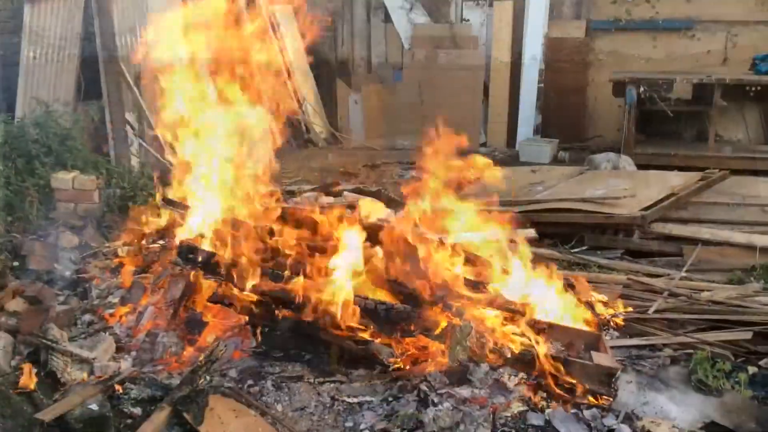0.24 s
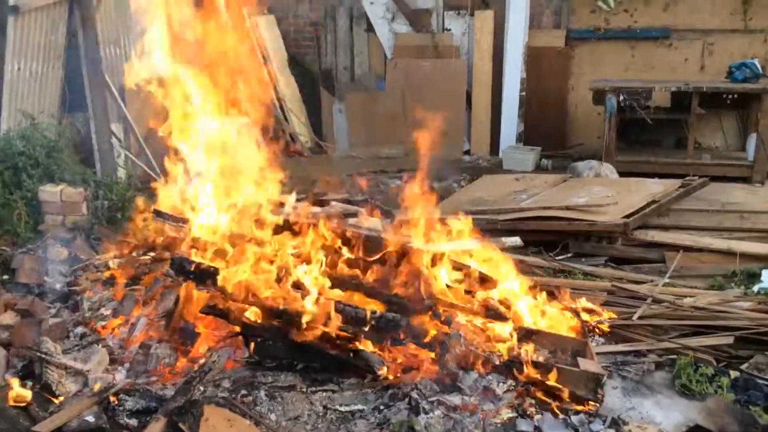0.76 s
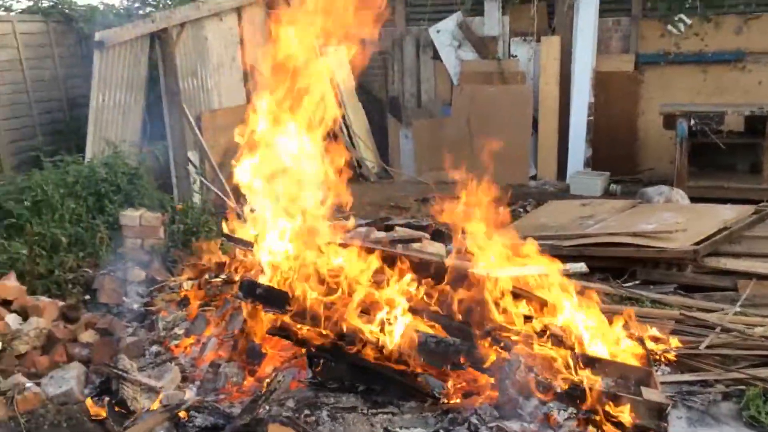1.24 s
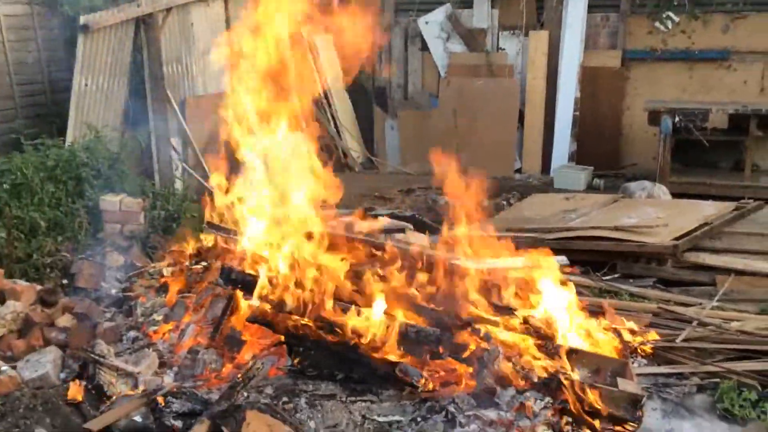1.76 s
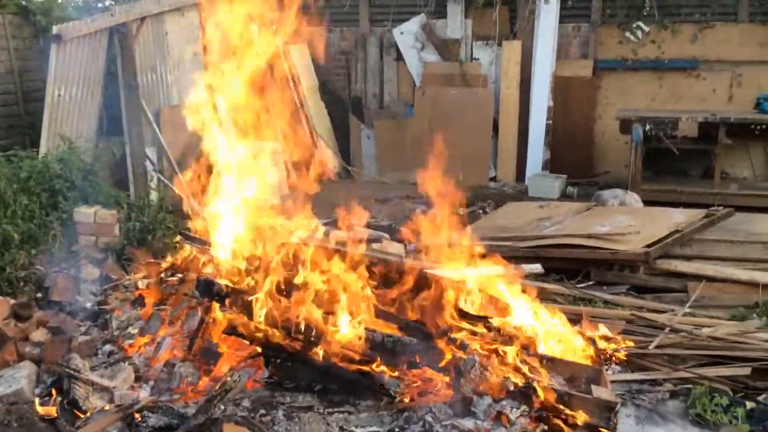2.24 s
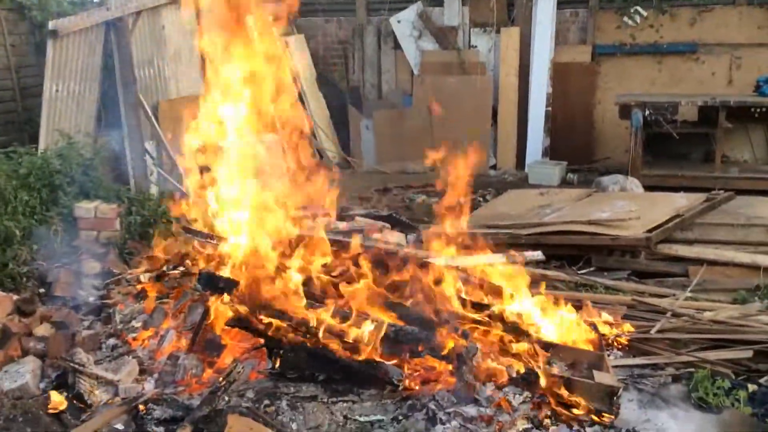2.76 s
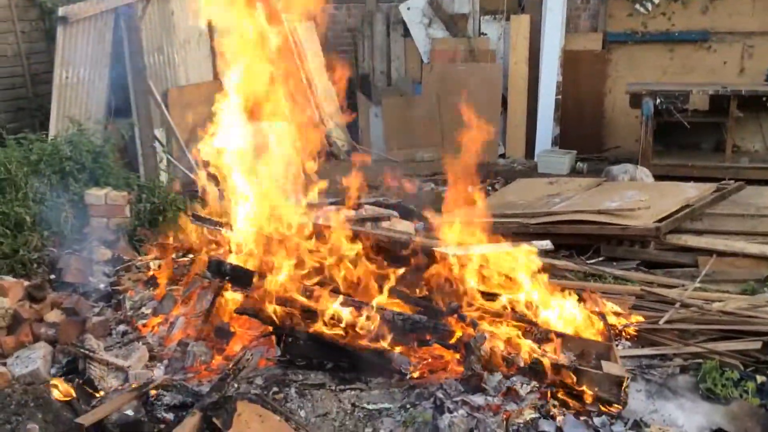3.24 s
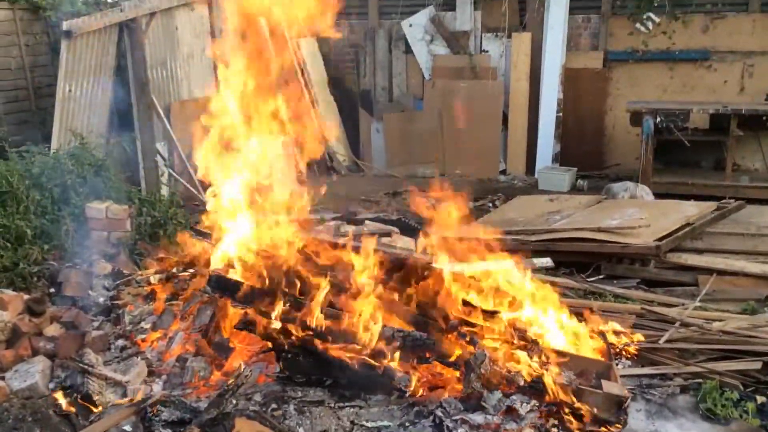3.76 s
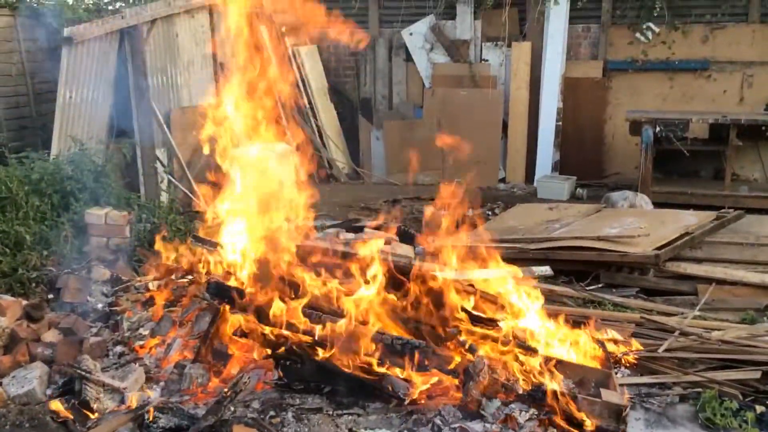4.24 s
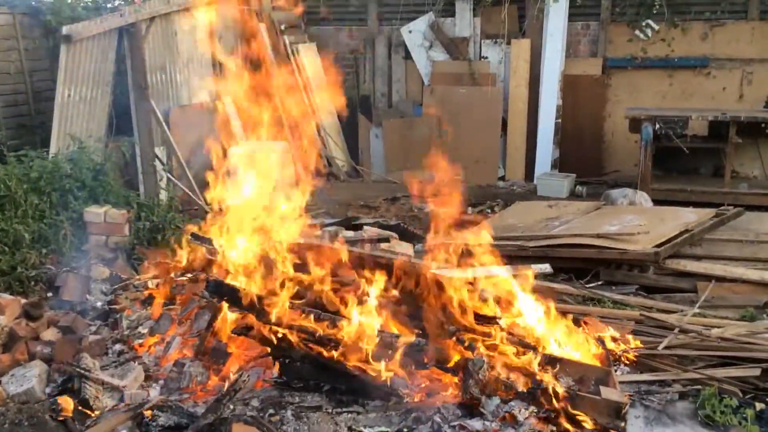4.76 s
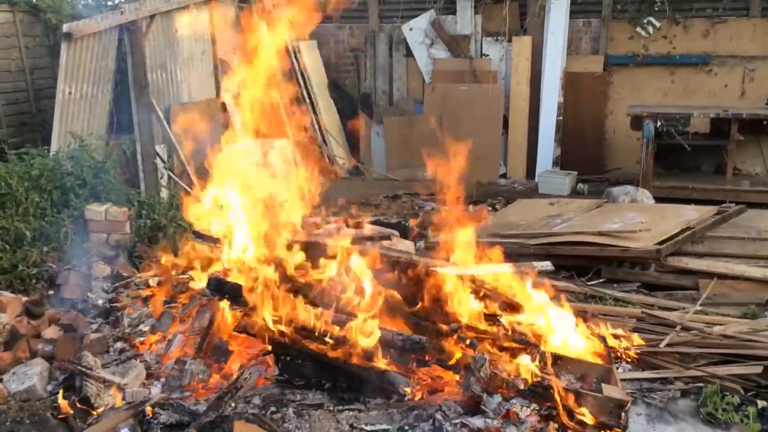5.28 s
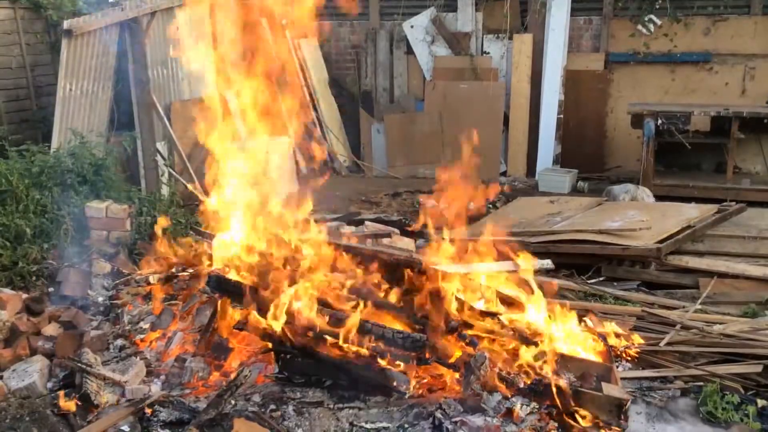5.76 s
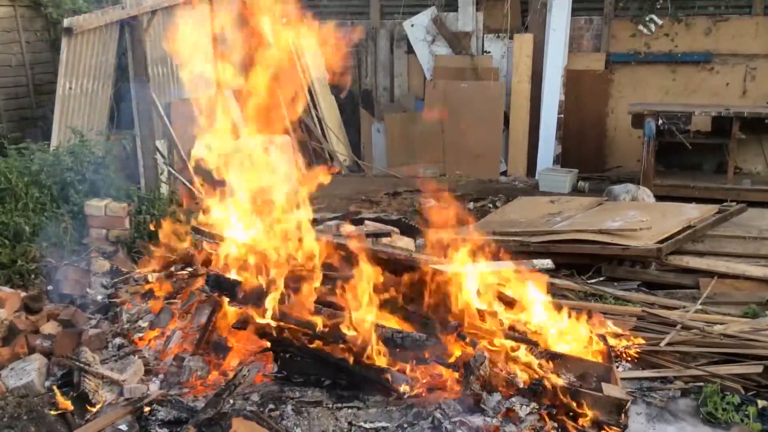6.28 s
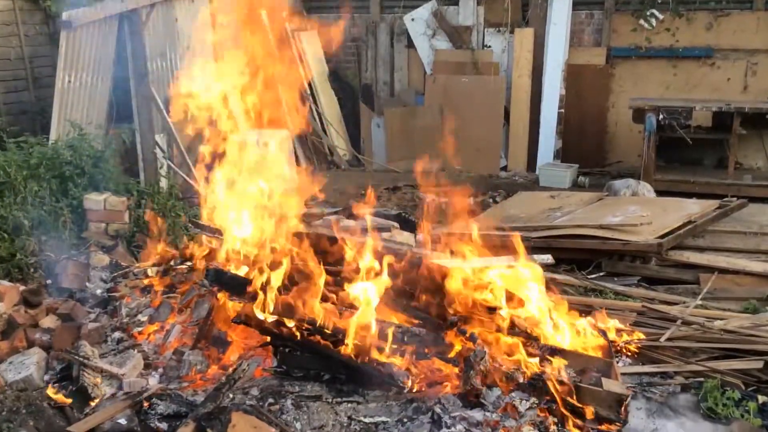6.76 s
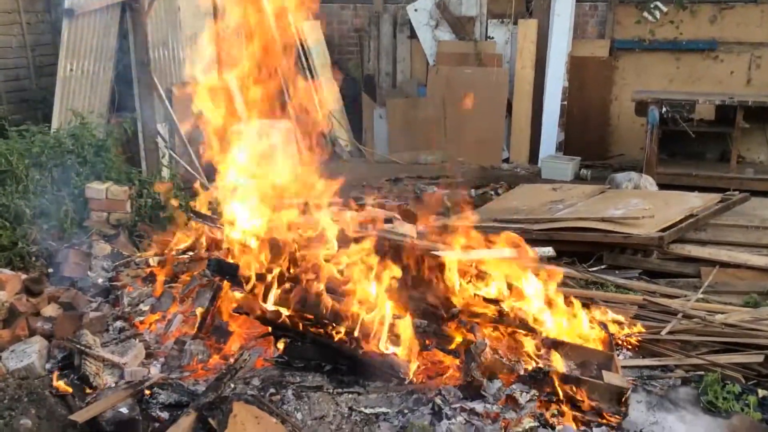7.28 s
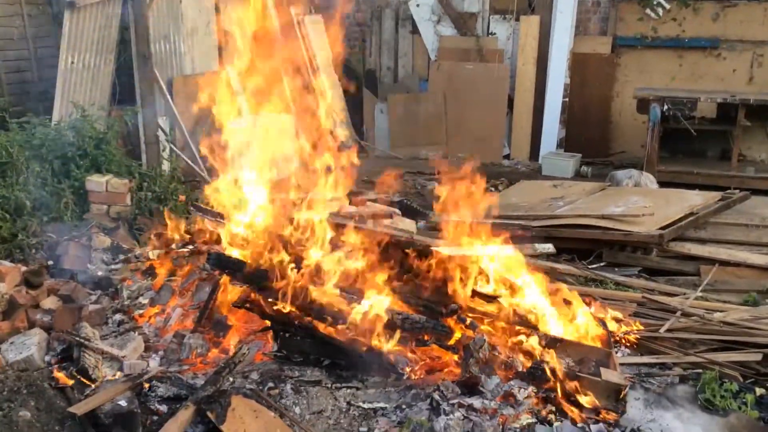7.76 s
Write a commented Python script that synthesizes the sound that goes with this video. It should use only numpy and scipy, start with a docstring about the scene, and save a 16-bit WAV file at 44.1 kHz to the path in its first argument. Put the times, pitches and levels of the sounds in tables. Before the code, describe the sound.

A bonfire of scrap wood burns a few metres away in a small yard. Sharp irregular snaps, some very loud, stand out over dense fine crackling and bright twig ticks. Bigger pieces crack with a dull thump and a brief woody knock. Brief sizzles of sap, soft hiss and a quiet low roar lie beneath. Nearby walls and clutter add quick, scattered echoes. The mono pickup is close and clear.

```python
"""Bonfire in a small yard

Scrap wood snaps and pops a few metres away; each snap is a sharp pulse with splintering over a dull thump.
Thick pieces knock as dying sines, thin twigs tick; near walls and clutter throw delayed, scattered copies back.
Crackle and sizzling sap are crowds of tiny bursts; hiss, the low roar of flames and far traffic are
shaped noise; a faint hum is a sine wavering in pitch and level."""
import sys
import numpy as np
from scipy import signal
from scipy.fft import rfft, irfft
from scipy.io import wavfile
from scipy.ndimage import uniform_filter1d

SR = 44100
rng = np.random.default_rng(int(sys.argv[2]) if len(sys.argv) > 2 else 0)


def transcribe(u):
    """Save the signal u as a 16-bit wav file named by the first command-line argument.

    u: samples, shape (n,) or (channels, n), limited to [-1, 1]; the rate is SR.
    q: integer samples, one column per channel.
    """
    v = np.clip(np.atleast_2d(u).T, -1, 1)
    q = np.round(v * 32767).astype(np.int16)
    wavfile.write(sys.argv[1], SR, q)


N = 353682

# clear snaps; thin twigs are narrow, thick wood wide, snaps hidden behind the pile have a high return:
# (time [s], direct level [dB], centre [Hz], spread [octaves], yard return re direct [dB])
SNAPS = [(0.0005, -9, 11200, 0.69, -1), (0.0358, -20.5, 9000, 0.93, -15), (0.0821, -27, 3530, 0.42, 10),
         (0.093, -30.5, 10910, 1.1, 14), (0.1858, -14, 12700, 0.16, -5), (0.217, -13.5, 9350, 0.5, -1.5),
         (0.236, -19, 6760, 1.4, -1), (0.307, -14, 10200, 0.32, -7), (0.3125, -13.5, 11300, 0.19, -12),
         (0.867, -16.5, 6070, 0.16, 2.5), (1.073, -14.5, 7260, 1.1, -1.5), (1.0942, -13.5, 4230, 1.4, -3.5),
         (1.2397, -12.5, 5330, 0.79, -5), (1.351, -16.5, 7200, 0.7, -1.5), (1.437, 0, 10800, 0.48, 0.5),
         (1.4602, -5.5, 8900, 0.48, -7), (1.524, -6, 5700, 0.58, -6.5), (1.6093, -11, 9500, 0.38, -8),
         (1.6183, 0, 10300, 0.65, -2), (1.6758, -16.5, 8260, 1.4, 2), (1.7418, -16.5, 910, 0.32, -7),
         (1.9323, 0, 8160, 0.39, -8), (2.1977, -10, 11200, 0.18, -5), (2.211, -13, 5270, 1.03, -1.5),
         (2.2484, -10.5, 10600, 0.37, -3.5), (2.2894, 0, 9300, 0.63, 1), (2.5895, -10, 8600, 0.86, -6),
         (2.703, -14, 6800, 0.9, -5), (2.899, -15, 10300, 0.34, -6), (3.1345, -14.5, 6650, 0.52, -0.5),
         (3.1505, -9, 2530, 0.39, -7.5), (3.487, -19.5, 3980, 1.2, -7), (3.5581, -6, 9700, 0.54, -3.5),
         (3.8756, 1, 4200, 0.78, -6.5), (3.9978, -9, 9250, 0.37, -7), (4.0897, -7.5, 10500, 0.69, -8.5),
         (4.309, -20.5, 300, 1.33, -15), (4.335, -26, 3250, 1.2, 10), (4.3793, -7, 9500, 0.59, -9.5),
         (4.4406, 1, 9400, 0.45, -6.5), (4.4675, -14.5, 9300, 0.93, 4), (4.568, -13.5, 850, 0.54, -11),
         (4.6526, -12.5, 7080, 0.66, -5), (4.7014, -9.5, 4640, 1.2, -2), (4.917, -7.5, 7800, 0.52, -4.5),
         (4.9636, -18, 5830, 0.8, -10), (4.9814, -6.5, 8500, 0.54, -7.5), (5.2938, -9.5, 2900, 1.24, 0.5),
         (5.3353, -15, 3480, 0.99, -10.5), (5.4493, -9.5, 3050, 0.87, 0), (5.474, -16, 3300, 0.28, 3),
         (5.569, -12.5, 9860, 0.28, -14), (5.6139, -2.5, 11600, 0.57, -8.5),
         (5.7733, -23.5, 8100, 1.2, 8.5), (5.814, -7, 10900, 0.71, -1), (5.9485, 0, 6800, 1.25, -5.5),
         (6.1166, 2.5, 3270, 0.53, -3.5), (6.6218, -13, 4230, 0.54, -10), (6.7345, -12, 4600, 1.5, 0),
         (6.7491, 0.5, 2920, 0.51, -3), (6.881, -13, 7600, 0.6, -5.5), (7.1134, -15.5, 7250, 0.77, -2.5),
         (7.242, -1.3, 8900, 0.61, -8.5), (7.7374, 0.9, 4450, 0.54, -4.5), (7.771, -11, 3000, 0.46, -1),
         (7.871, -15, 5400, 0.57, -8), (7.988, -14, 7010, 0.49, -7)]
# flat walls and boards around the fire: (delay [ms], level [dB], smear [ms])
WALLS = [(5.83, -4.5, 1), (14., -15.5, 0.84), (17.5, -24, 0.92)]
# liveliness of fine crackle and hiss: (time [s], level [dB])
LIVELY = [(0, 5), (.7, 6), (1, -1), (1.3, 3), (2.1, 5), (2.45, -3), (3.3, 1.5), (3.7, 9), (4.1, -10),
          (4.5, 3), (5.4, 4), (5.7, 4.5), (6.5, -2), (6.9, 5), (7.35, -2.5), (7.65, -2.5), (8.02, 8.5)]
LEAD = 128  # samples ahead of each pulse
# pulse phase [rad]: snaps rise to a crest and fall into a deeper dip, thumps push outward first
SNAP_PHASE, THUMP_PHASE = 2.6, -0.9


def gain_of(db):
    """Amplitude factor of a level in dB."""
    return 10 ** (np.asarray(db) / 20)


def unit(x):
    """Energy 1 along the last axis."""
    return x / np.sqrt((x ** 2).sum(-1, keepdims=True) + 1e-30)


def burst_colour(f, hz, octaves, skirt_db):
    """Unit-rms spectrum: a bell on the pitch scale over a wide skirt that fades far above the centre."""
    away = np.log2(f / hz) / np.clip(octaves, 0.2, 2)
    bell = np.exp(-away ** 2 / 4) * np.sqrt(hz / f)
    skirt = gain_of(skirt_db) * f / (f + 47.0) / (1 + (f / (3.8 * hz)) ** 2)
    colour = bell + skirt
    return colour / np.sqrt((colour ** 2).mean(-1, keepdims=True))


def yard_tail(noise, lumps, ms, f):
    """Scatter off clutter: lumpy noise, a shorter decay ruling the bass and a longer one the treble."""
    # bass first, then treble: (t60 before tapering [s], level [dB])
    decays = [(0.14, -4.5), (0.21, 0)]
    cross_hz, lump_db = 6330, 4.5
    debris = noise * gain_of(lump_db * lumps)
    debris = debris * np.clip(ms / 9.1, 0, 1) * np.sqrt(1 - ms / ms[-1])
    bass = 1 / (1 + (f / cross_hz) ** 2)
    tail = 0
    for share, (t60_s, db) in zip((bass, 1 - bass), decays):
        decay = gain_of(-60 * abs(ms) / 1000 / t60_s)
        tail = tail + gain_of(db) * share * rfft(unit(debris * decay))
    return tail


def bursts(rows, phase, size, skirt_db, splinter_ms=5.0, place_ms=0.111, place_db=0.0, smear_db=-1.5):
    """Each row (s, direct dB, Hz, octaves, return dB) gives pulse, splintering, echoes and tail in one colour."""
    rip_cycles, rip_longest_ms, jerks_db, splinter_db = 3, 0.5, -5.5, -5.5
    s, direct_db, hz, octaves, back_db = np.transpose(rows)[:, :, None]
    ms = (np.arange(size) - LEAD) * 1000 / SR
    f = np.fft.rfftfreq(size, 1 / SR) + 1
    noise = rng.standard_normal((len(rows), 2, size))
    place = rng.standard_normal((len(rows), len(WALLS), 2, 1))
    lumps = rng.standard_normal((len(rows), size // 64)).repeat(64, axis=1)

    # lopsided pressure pulse plus jerks, then fibres keep tearing
    pulse = np.exp(1j * phase - 2j * np.pi * f * LEAD / SR)
    rip_ms = np.minimum(1000 * rip_cycles / hz, rip_longest_ms)
    jerks = unit(noise[:, 1] ** 3 * (ms > 0) * np.exp(-abs(ms) / rip_ms))
    pulse = (pulse + gain_of(jerks_db) * rfft(jerks)) / np.hypot(1, gain_of(jerks_db))
    splinter = unit(noise[:, 0] * (ms > 0) * np.exp(-abs(ms) / splinter_ms))
    direct = pulse + gain_of(splinter_db) * rfft(splinter)

    sharp = smeared = 0
    for k, (delay_ms, db, smear_ms) in enumerate(WALLS):
        # each burst has its own place in the pile
        delay_ms = delay_ms + place_ms * place[:, k, 0]
        gain = gain_of(db + place_db * place[:, k, 1])
        sharp = sharp + gain * np.exp(-2j * np.pi * f * delay_ms / 1000)
        smear = (ms > delay_ms) * np.exp(-abs(ms - delay_ms) / smear_ms)
        smeared = smeared + gain * unit(noise[:, 0] * smear)
    back = sharp * direct + gain_of(smear_db) * rfft(smeared)
    back = back + yard_tail(noise[:, 1], lumps, ms, f)

    spectrum = gain_of(direct_db) * direct + gain_of(back_db) * back
    sounds = irfft(spectrum * burst_colour(f, hz, octaves, skirt_db))
    out = np.zeros(N + size + LEAD)
    for at, sound in zip(np.round(s[:, 0] * SR).astype(int), sounds):
        out[at:at + size] += sound
    return out[LEAD:LEAD + N]


def roar(level_db=-53.5, patchy_db=1.6, follow=0.26):
    """Flames, far traffic and hiss: noise shaped in time-frequency, with drifting patches."""
    # mean spectrum: (frequency [Hz], relative density [dB per Hz])
    spectrum = [(22, -47), (36, -13), (52, 6.5), (115, -0.5), (185, 1.5), (413, -6), (1050, -4.5),
                (1450, -11), (2000, -17), (3400, -22.5), (7600, -25.5), (13600, -25), (15400, -19.5)]
    # middle of the roar, thinning for a moment: (time [s], level [dB])
    swell = [(1.9, -1.84), (2.5, -6), (3.3, -2)]
    hop, frames = 512, N // 512 + 5
    hz = np.fft.rfftfreq(2048, 1 / SR)
    frame_s = np.arange(frames) * hop / SR
    real, imag, patches = rng.standard_normal((frames, 1025, 3)).T
    patches = uniform_filter1d(uniform_filter1d(patches, size=7, axis=0), size=8, axis=1)
    f, db = np.transpose(spectrum)
    field_db = np.interp(np.log(hz + 1), np.log(f + 1), db)[:, None]
    field_db = field_db + patchy_db * patches / patches.std()
    # hiss, not rumble, follows the crackle
    hiss_share = 1 / (1 + (1800.0 / (hz[:, None] + 1)) ** 4)
    field_db = field_db + follow * hiss_share * np.interp(frame_s, *np.transpose(LIVELY))
    middle = np.exp(-np.log2((hz[:, None] + 1) / 1070.0) ** 2 / 6.3)
    field_db = field_db + middle * np.interp(frame_s, *np.transpose(swell))
    x = signal.istft((real + 1j * imag) * gain_of(field_db), nperseg=2048, noverlap=1536)[1][:N]
    return gain_of(level_db) * x / x.std()


def hum(flutter_db=2.2, wander_hz=2.07):
    """Faint low sine, probably a distant engine: wavering, swelling to its strongest near 7.3 s, then easing."""
    # (time [s], mean frequency [Hz], mean level [dB rms])
    course = [(0, 63, -65.5), (3.1, 66, -62), (3.9, 58.4, -70), (5.3, 65, -61), (6., 77, -64.5),
              (7.3, 79.5, -56.5), (8.02, 78.6, -60)]
    s, hz, db = np.transpose(course)
    t = np.arange(N) / SR
    knots_s = np.arange(100) * 0.074
    flutter, wander = (np.interp(t, knots_s, v) for v in rng.standard_normal((100, 2)).T)
    turns = np.cumsum(np.interp(t, s, hz) + wander_hz * wander) / SR
    level = gain_of(np.interp(t, s, db) + flutter_db * flutter)
    return np.sqrt(2) * level * np.sin(2 * np.pi * turns)


def crackle(count=800, level_db=-46.5, spread_db=7.5, low_hz=3130.0, high_hz=17300.0):
    """Small pockets burst at random; most are faint, a few stand out."""
    when, size, pitch, shade, width = rng.random((count, 5)).T
    s = when * N / SR
    db = np.interp(s, *np.transpose(LIVELY)) + level_db
    db = db - spread_db * np.log(np.maximum(size, 0.16))
    hz = low_hz * (high_hz / low_hz) ** np.sqrt(pitch)
    rows = np.c_[s, db, hz, 0.2 + 0.6 * width, db + 1 - 8 * shade]
    return bursts(rows, SNAP_PHASE, size=2048, skirt_db=-9.0)


def snaps():
    """Pockets of steam burst: sharp pulses with short splintering."""
    s, db, hz, spread, back_db = np.transpose(SNAPS)
    return bursts(np.c_[s, db, hz, spread, db + back_db], SNAP_PHASE, size=7168, skirt_db=-11.0)


def thumps(octaves=0.52, back_db=-6.0):
    """Each snap pushes dully through the wood: weak for thin bright twigs, stronger for wide or low snaps."""
    level_db, db_per_spread, db_per_pitch = -34.5, 16, -9  # slopes per octave
    centre_hz, scatter_octaves = 362, 0.15
    s, db, hz, spread, _ = np.transpose(SNAPS)
    db = db + level_db + db_per_spread * spread + db_per_pitch * np.log2(np.maximum(hz, 2000.0) / 5000)
    hz = centre_hz * 2 ** (scatter_octaves * rng.standard_normal(len(s)))
    rows = np.c_[s, db, hz, octaves + 0 * s, db + back_db]
    return bursts(rows, THUMP_PHASE, size=4096, skirt_db=-58)


def knocks(ring_cycles=21):
    """Thick pieces ring briefly as they split: sines dying 60 dB in ring_cycles, repeated by the walls."""
    # (time [s], pitch [Hz], peak level [dB])
    splits = [(0.0824, 1160, -39), (.0817, 2160, -31), (1.5234, 3640, -18), (1.7413, 2380, -38),
              (3.15, 1260, -31), (3.15, 2000, -45), (3.8761, 2180, -41), (3.8756, 3040, -13),
              (4.7017, 905, -37.5), (5.2937, 1350, -25), (5.4495, 3420, -14), (6.116, 1040, -28),
              (6.1166, 2650, -16), (6.7495, 4100, -15), (7.737, 1400, -23.5), (7.7378, 3270, -20)]
    t, out = np.arange(1024) / SR, np.zeros(N + SR)
    for s, hz, db in splits:
        for delay_ms, path_db, _ in [(0.0042, 0, 0)] + WALLS:  # direct path first
            at = round((s + delay_ms / 1000) * SR)
            envelope = gain_of(db + path_db - 60 * hz * t / ring_cycles)
            out[at:at + len(t)] += envelope * np.sin(2 * np.pi * hz * t)
    return out[:N]


def sizzle(count=16, spread_db=3.5, scatter_octaves=0.96):
    """Sap boils out of a log: each run is a crowd of tiny bursts, denser at its start."""
    # (start [s], length [s], base level [dB], centre [Hz])
    runs = [(0.232, 0.08, -31, 9050), (3.636, 0.11, -28.5, 8300), (4.297, 0.074, -30, 7000),
            (4.47, 0.067, -29, 8800), (5.318, 0.07, -26, 5500), (5.823, 0.032, -27, 10000),
            (6.327, 0.025, -30.5, 10000)]
    start, length, db, hz = np.transpose(runs)[:, :, None]
    when, size, pitch = np.moveaxis(rng.random((len(runs), count, 3)), 2, 0)
    s = (start + length * when ** 1.3).ravel()
    db = (db - spread_db * np.log(size + 0.11)).ravel()
    hz = (hz * 2 ** (scatter_octaves * (2 * pitch - 1))).ravel()
    return bursts(np.c_[s, db, hz, 0.6 + 0 * s, db - 6.0], SNAP_PHASE, size=2048, skirt_db=0.0)


def ticks(centre_hz=9700.0, scatter_octaves=0.14, back_db=-4.5):
    """Thin twigs burst faint and bright, each with its own pitch near a common one."""
    # (time [s], direct level [dB])
    twigs = [(0.2738, -18), (0.293, -18.5), (.5052, -21), (.6379, -15.5), (0.698, -21.5), (0.8117, -23.5),
             (0.8918, -16), (1.1292, -18), (1.3178, -23.5), (1.3399, -27), (1.503, -25), (1.7019, -18.5),
             (1.873, -14.5), (2.0428, -24.5), (2.0971, -17.5), (2.509, -32), (2.6056, -22), (2.740, -20.5),
             (2.747, -19.5), (2.7878, -19), (2.8197, -28), (2.8823, -24), (2.953, -25.5), (2.966, -23),
             (3.046, -14.5), (3.066, -21.5), (3.116, -23), (3.282, -15), (3.8385, -19), (4.159, -16.5),
             (4.209, -26), (4.2747, -18.5), (4.2941, -17), (4.5758, -21), (4.8657, -18.5), (4.8923, -25),
             (5.055, -29), (5.076, -21.5), (5.089, -20), (5.226, -19.5), (5.322, -24), (5.4305, -22),
             (5.5227, -20.5), (5.686, -29), (6.0357, -25), (6.0767, -17.5), (6.2554, -37), (6.28, -15.5),
             (6.315, -33), (6.3275, -15.5), (6.425, -22.5), (6.537, -22.5), (6.6815, -16), (6.8678, -28),
             (6.923, -17.5), (7.2155, -17), (7.3255, -21), (7.3608, -18), (7.4364, -21), (7.4855, -23.5),
             (7.9166, -22.5), (8.0136, -15.5)]
    s, db = np.transpose(twigs)
    hz = centre_hz * 2 ** (scatter_octaves * rng.standard_normal(len(s)))
    return bursts(np.c_[s, db, hz, 0.6 + 0 * s, db + back_db], SNAP_PHASE, size=4096, skirt_db=-2.0)


def scene():
    """Sum of all layers, one channel."""
    fire = snaps() + thumps() + knocks() + ticks() + crackle() + sizzle()
    return (fire + roar() + hum())[None]


def record(dry, edge_hz=15450):
    """Band limit of the recorder: a linear-phase low-pass."""
    lowpass = signal.firwin(255, edge_hz, window=("kaiser", 9), fs=SR)
    return signal.oaconvolve(dry, lowpass[None], "same")


dry = scene()
out = record(dry)
transcribe(out)
```